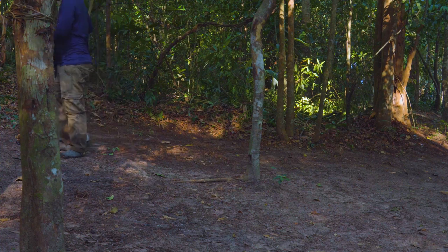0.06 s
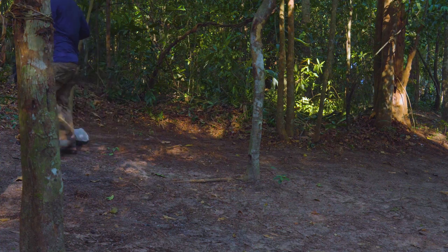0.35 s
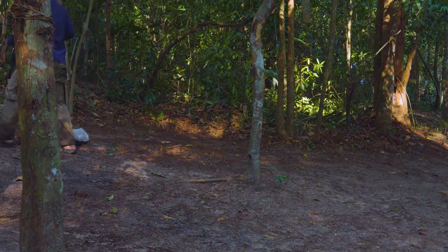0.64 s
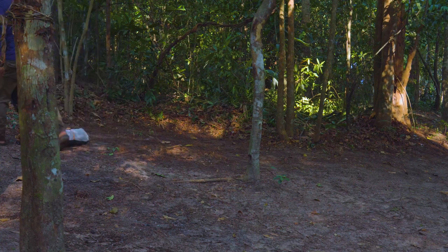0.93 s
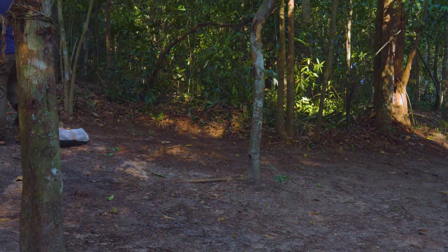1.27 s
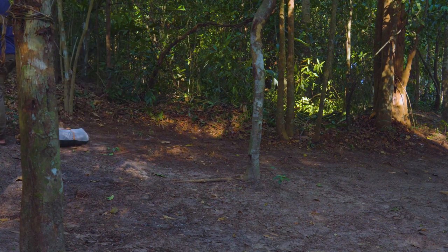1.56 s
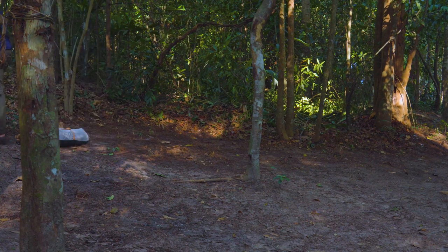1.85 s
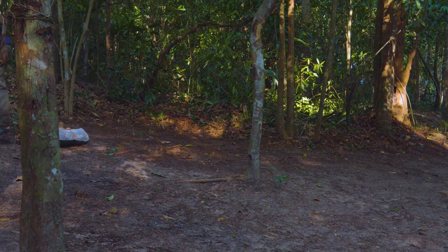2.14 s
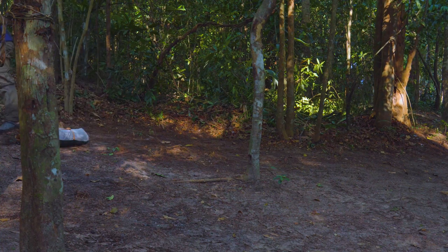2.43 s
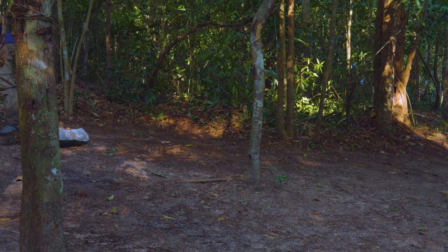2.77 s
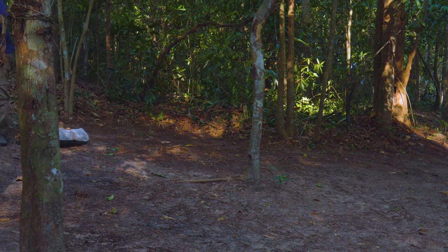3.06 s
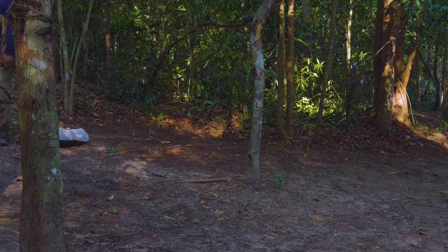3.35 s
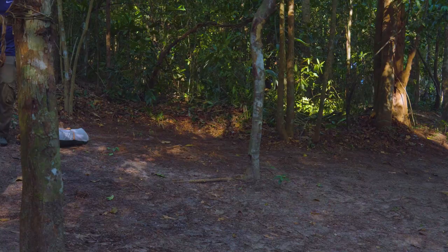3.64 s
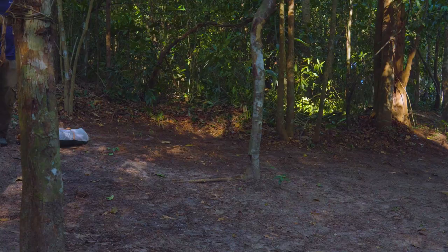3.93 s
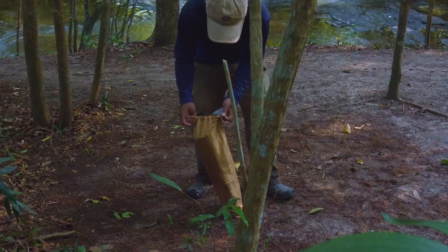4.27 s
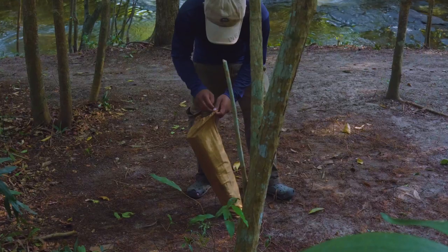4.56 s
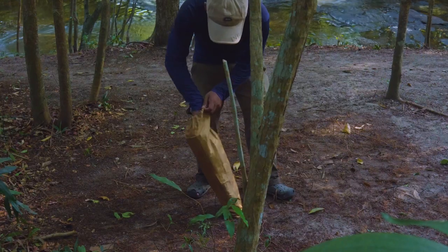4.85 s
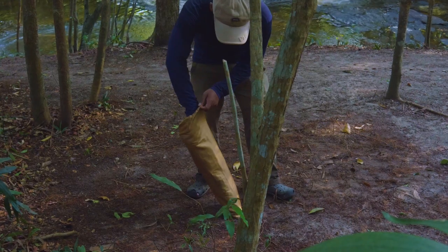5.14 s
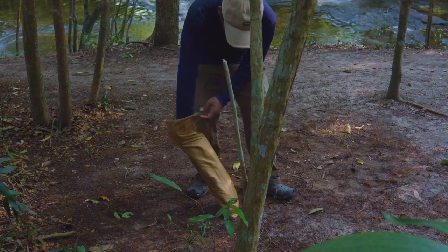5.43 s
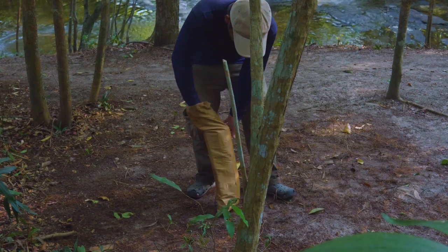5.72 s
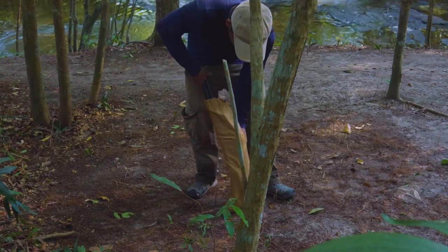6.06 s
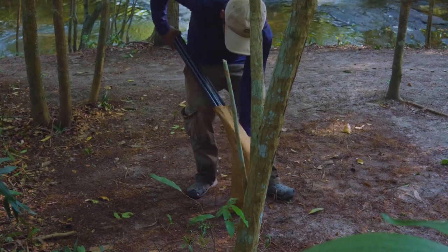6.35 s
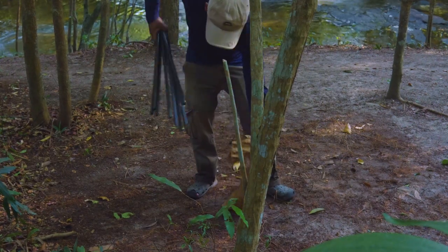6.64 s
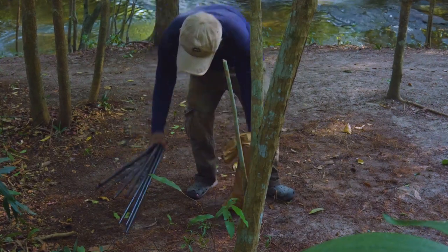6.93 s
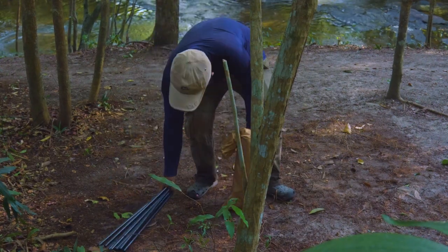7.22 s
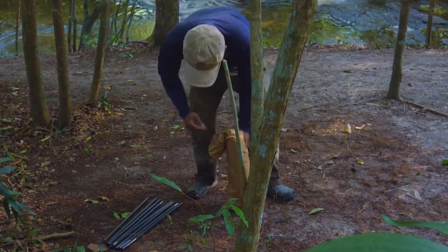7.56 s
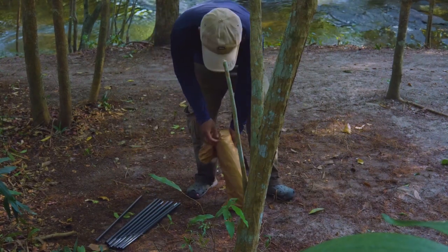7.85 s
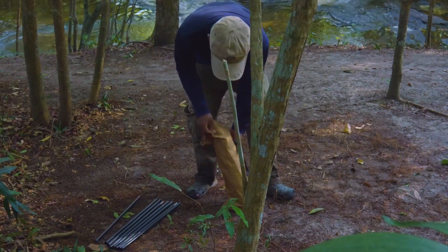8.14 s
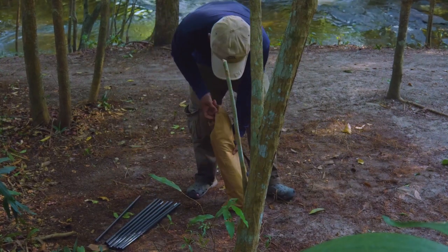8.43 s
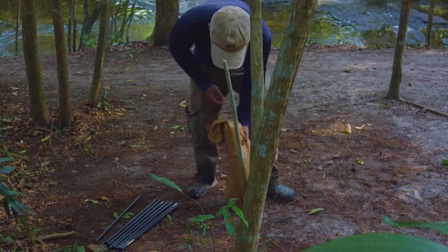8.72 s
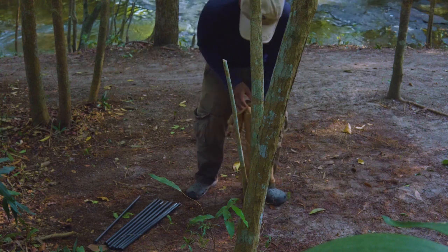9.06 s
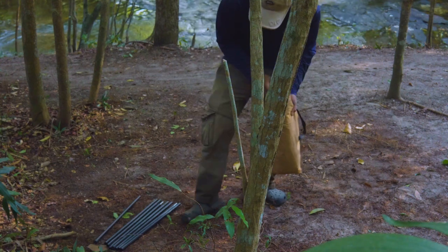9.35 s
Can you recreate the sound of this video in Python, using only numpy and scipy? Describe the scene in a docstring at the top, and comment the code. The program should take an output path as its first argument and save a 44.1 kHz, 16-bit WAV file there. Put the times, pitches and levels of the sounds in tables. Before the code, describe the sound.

A rocky stream rushes and babbles in a forest, with small gurgles and a thin, high cicada whine that swells and eases. About four seconds in, the listening spot changes and the water turns brighter. Metal tent poles click a few times, muffled inside a cloth bag, then drop to the ground nearby with a short, ringing clatter. The stream dips briefly under the loud impacts and swells back.

```python
"""A rocky stream rushes through a forest while cicadas whine in the trees, heard from one spot, then another.
The water sounds by the resonance of air bubbles, the cicadas by tymbal clicks that ring their bodies.
At the second spot metal tent poles click in their bag, slide out and drop to the ground, each impact
exciting their modes. The clatter pushes an automatic gain control down, and the stream swells back."""
import sys
import numpy as np
from scipy import signal
from scipy.fft import rfft, irfft
from scipy.io import wavfile
from scipy.ndimage import uniform_filter1d, minimum_filter1d

SR = 44100
rng = np.random.default_rng(int(sys.argv[2]) if len(sys.argv) > 2 else 0)


def transcribe(signal):
    """Save signal, clipped to [-1, 1], as a 16-bit WAV file at the path in sys.argv[1]."""
    frames = np.atleast_2d(signal).T
    limited = np.clip(frames, -1, 1)
    pcm = np.round(limited * 32767).astype(np.int16)
    wavfile.write(sys.argv[1], SR, pcm)


N = 422919

MOVE_S = 4.135   # the listening spot changes
TYMBAL_HZ = (354.6, 357.2)   # click rate on arrival at each spot
CONTACTS_PER_S = 600   # grain of the poles' chatter
# Modes of the poles. Each row: frequency in Hz, spread between poles in Hz, level in dB, t60 in seconds.
POLE_MODES = [(905, 18, -19, .6), (1420, 20, -14, .3), (1550, 25, -11, .35), (1717, 11, -12.5, .9),
              (1765, 30, -10, .5), (1820, 30, -9, .4), (2170, 25, -5, .43), (2255, 40, -3, .38),
              (2760, 20, -5, .28), (2812, 20, -4, .28), (2897, 7, .5, .31), (2950, 30, -6, .25),
              (3386, 30, -3, .33), (4040, 20, -16, .4), (4198, 22, -11, .5), (4422, 30, -10.5, .5),
              (4500, 25, -15, .5), (4601, 15, -10.5, .55), (4750, 30, -13, .4), (4820, 25, -13, .4),
              (4968, 12, -14, .55), (5272, 14, -19, .5), (5470, 30, -14, .4), (5690, 60, -13, .4),
              (6400, 90, -14, .4), (6800, 100, -15, .4), (7270, 70, -14, .45), (7430, 70, -13, .45),
              (8310, 70, -15.5, .4), (8900, 70, -18, .3), (9080, 70, -17, .4), (9250, 70, -17, .4),
              (10150, 120, -19, .3), (10550, 140, -18, .25), (11150, 60, -19, .28), (11530, 50, -22, .22),
              (12300, 100, -22, .2), (12650, 120, -22, .2)]
# Spectrum of a contact between tubes. Each row: frequency in Hz, spectral density in dB.
CRACK_SPECTRUM = [(40, -41), (300, -78), (900, -61), (1500, 16.5), (3000, 8.5), (5000, 2), (8000, -4),
                  (12500, -4), (15000, -42)]


def from_db(db):
    """Amplitude grows tenfold with every 20 dB."""
    return 10 ** (np.asarray(db) / 20)


def rms_one(x):
    """Normalisation to unit mean power."""
    return x / np.sqrt(np.mean(x ** 2) + 1e-20)


def in_time(points):
    """Linear interpolation of (seconds, value) points at every sample."""
    return np.interp(np.arange(N) / SR, *np.transpose(points))


def at_hz(points, hz):
    """Interpolation of (Hz, value) points on a log-frequency axis."""
    f, value = np.transpose(points)
    return np.interp(np.log(np.maximum(hz, 1)), np.log(f), value)


def at_spots(first, second):
    """A step from one value to another as the listening spot changes."""
    return np.where(np.arange(N) / SR < MOVE_S, first, second)


def drift(rate, size):
    """Random modulation of rms 1, through `rate` points a second."""
    at = np.arange(size) * rate / SR
    return rms_one(np.interp(at, np.arange(4096), rng.standard_normal(4096)))


def low_cut(x, hz):
    """A second-order high-pass: little bass remains below `hz`."""
    return signal.sosfilt(signal.butter(2, hz, "high", fs=SR, output="sos"), x + 1e-18)


def rapids():
    """Bubble resonance among the rocks at the first spot: a far rush under a near babble."""
    # Spectrum of the rush. Each row: frequency in Hz, spectral density in dB.
    spectrum = [(50, -53), (110, -51), (170, -32), (260, -20), (450, -4), (660, 0), (900, -3.0), (1200, -1),
                (1900, -3), (3600, -5.5), (5400, -16), (6100, -18.5), (8500, -24), (12000, -28.5),
                (14500, -45)]
    # Its width. Each row: frequency in Hz, side minus mid in dB.
    side = [(60, -8), (110, -11), (200, -15), (380, -11.5), (690, -8.5), (1280, -0.5), (2360, -3.5),
            (4360, -1), (8040, 10.5), (14800, 29)]
    # Its direction. Each row: frequency in Hz, left minus right in dB.
    pan = [(60, -1.5), (110, 3), (200, -0.5), (380, -3), (690, -5.5), (1280, -9.5), (2360, -5.0),
           (4360, -2), (8040, 2), (14800, -2)]
    near = babble(0, MOVE_S, low_hz=430, high_hz=1400, level_db=-28.5, spread_db=18,
                  pan_shift_db=-6, cycles=24, count=300)
    far = rush(spectrum, side, pan, patchy_db=0.6, flicker_rate=24, lag_s=.00004)
    out = low_cut(near, hz=300)
    add(out, 0, from_db(-35.5) * far)
    return out


def rush(spectrum, side, pan, patchy_db, flicker_rate, lag_s, size=2 ** 18, bands=14):
    """Countless far bubbles sum incoherently to a noise whose half-octave bands swell independently."""
    hz = np.fft.rfftfreq(size, 1 / SR)
    common, apart = rfft(rng.standard_normal((2, size)))
    lean = from_db(at_hz(pan, hz) / 2)
    width = from_db(at_hz(side, hz)) ** 2
    power = lean ** 2 + lean ** -2
    coherence = np.clip((1 - width) / (1 + width) * power / 2, 0, .97)
    ears = np.sqrt(1 + coherence) * common + np.sqrt(1 - coherence) * apart * [[1], [-1]]
    ears *= [lean * np.exp(-2j * np.pi * hz * lag_s), 1 / lean]
    ears *= from_db(at_hz(spectrum, hz)) / np.sqrt(power + 2 * coherence)
    band = np.clip((2 * np.log2(np.maximum(hz, 1) / 140)).astype(int), 0, bands - 1)
    out = sum(irfft(ears * (band == k)) * from_db(patchy_db * drift(flicker_rate, size))
              for k in range(bands))
    return out / np.std(out.mean(axis=0))


def babble(start, end, low_hz, high_hz, level_db, spread_db, pan_shift_db, cycles, count):
    """Nearer bubbles resonate one by one, at random times, pitches and strengths."""
    out = np.zeros((2, N))
    for when, pitch, faintness, place in rng.random((count, 4)):
        pan_db = pan_shift_db + 5.9 * (place - 2)   # negative is to the right
        gain = from_db(level_db - spread_db * np.sqrt(faintness) + pan_db * np.array([[.5], [-.5]]))
        hz = low_hz * (high_hz / low_hz) ** pitch
        add(out, start + when * (end - start), gain * bubble(hz, cycles, rise=0.057))
    return out


def bubble(hz, cycles, rise):
    """A bubble is a damped oscillator whose pitch rises as it nears the surface."""
    age = np.arange(int(cycles * SR / hz)) * hz / SR / cycles   # 0 to 1
    phase = 2 * np.pi * cycles * age * (1 + rise * age / 2)
    return np.sin(phase) * from_db(-60 * age) * (1 - np.exp(-age * cycles))


def add(out, s, sound):
    """Superposition: a stereo sound joins the mix at `s` seconds."""
    i = max(int(s * SR), 0)
    out[:, i:i + sound.shape[-1]] += sound[:, :max(N - i, 0)]


def cicadas(gain_db=-1.7, wander_db=.5, flutter_db=2.5, throb_hz=25, throb_depth=.75):
    """Tymbal clicks drive a body resonance near 6.5 kHz; scattering by trees makes harmonics flutter."""
    # Spectrum of the song, one row to a spot. Each row: relative levels of harmonics 15 to 22 in dB.
    harmonics = [(-17, -6, -2.5, 1.3, -2.5, -4, -23, -16), (-17, -7, -2.5, 1.3, -1, -2, -17, -15)]
    rate, even, odd = tymbals()
    beat_hz = throb_hz + .55 * (rate - TYMBAL_HZ[0]) + 1.8 * drift(12, N)
    beat = 2 * np.pi * np.cumsum(beat_hz) / SR
    balance = 2 * even * odd / (even ** 2 + odd ** 2)   # 1 where even and odd are equally strong
    throb = throb_depth * balance * np.sin(beat)
    levels = even * (1 + throb), odd * (1 - throb)
    wobble = .0037 * (1 + .3 * drift(9, N)) * np.cos(beat) + .0005 * drift(20, N)
    phase = 2 * np.pi * np.cumsum(rate * (1 + wobble)) / SR
    out = np.zeros((2, N))
    for k, spot_dbs in enumerate(zip(*harmonics), 15):
        is_odd = k % 2
        path_phase = .42 * (drift(50, N) + .6 * drift(14, N) * [[1], [-1]]) / (1 + .5 * is_odd)
        flutter = flutter_db * (.75 * drift(70, N) + np.sin(2 * beat + drift(5, N))) / (1 + .3 * is_odd)
        out += from_db(at_spots(*spot_dbs) + flutter) * levels[is_odd] * np.sin(k * phase + path_phase)
    song = from_db(gain_db + wander_db * drift(7.4, N)) * out * np.sqrt(2)
    return song + from_db(10) * forest(song)


def tymbals(sag_hz_per_s=(.75, .85), odd_floor_db=(-62, -68), duck=0.76):
    """The click rate sets a sagging fundamental; swells shift energy from even harmonics to odd ones."""
    # The cicadas' effort. Each row: time in seconds, level of the even harmonics in dB.
    effort = [(0, -51), (.5, -50.5), (1.45, -49.5), (1.8, -56.5), (2.1, -50.5), (2.4, -51.5), (2.8, -53.5),
              (3.8, -54.5), (4.3, -54), (4.8, -49.5), (5.3, -53), (5.65, -49), (6, -51.5), (6.35, -49),
              (6.8, -53.5), (7.9, -49), (8.6, -52.5), (9.15, -50), (9.59, -52.5)]
    # Swells of the song. Each row: middle in seconds, half length in seconds, odd harmonics in dB.
    swells = [(1.14, 0.25, -46.5), (4.395, 0.26, -47), (5.083, 0.19, -49)]
    t = np.arange(N) / SR
    rate = at_spots(TYMBAL_HZ[0] - sag_hz_per_s[0] * t, TYMBAL_HZ[1] - sag_hz_per_s[1] * (t - MOVE_S))
    swell = sum(from_db(db) / (1 + np.abs((t - s) / half_s) ** 3) for s, half_s, db in swells)
    even = from_db(in_time(effort)) * (1 - duck * swell / swell.max())
    odd = np.hypot(from_db(at_spots(*odd_floor_db)), swell)
    return rate, even, odd


def forest(x, t60=0.45, level_db=-21, dull_hz=5000):
    """Reverberation: trunks and leaves scatter back a faint, dull tail."""
    t = np.arange(SR) / SR
    tail = rng.standard_normal((2, SR)) * from_db(-60 * t / t60) * (1 - np.exp(-t / 0.027))
    tail = signal.sosfilt(signal.butter(1, dull_hz, fs=SR, output="sos"), tail)
    return from_db(level_db) * signal.fftconvolve(x, rms_one(tail) / np.sqrt(SR), axes=1)[:, :N]


def gulps(length_s=.03, scatter=0.084, pan_db=-5, count=5):
    """Air trapped between rocks breaks into bubbles of like size, which resonate at like pitches."""
    # Pockets of air. Each row: start in seconds, pitch in Hz, level of the first bubble in dB.
    pockets = [(.085, 742, -26), (.69, 1180, -28), (.775, 652, -30), (.845, 1120, -23.5),
               (.865, 1220, -20.5), (1.41, 1340, -31), (1.579, 640, -34), (1.803, 1110, -35),
               (2.095, 630, -24.5), (2.222, 1210, -30), (2.308, 550, -35), (2.409, 603, -29),
               (2.545, 615, -32), (2.70, 597, -35), (3.009, 580, -32), (3.085, 627, -37), (3.22, 1220, -28),
               (3.297, 880, -35), (3.525, 1220, -27), (3.706, 652, -28), (3.84, 1150, -30)]
    out = np.zeros((2, N))
    for s, hz, db in pockets:
        for k, detune in enumerate(rng.normal(0, scatter, count)):
            gain = from_db(db - 5.6 * k + pan_db * np.array([[.5], [-.5]]))
            add(out, s + length_s * k / count, gain * bubble(hz * np.exp(detune), cycles=44, rise=0.096))
    return low_cut(out, hz=250)


def shallows():
    """Bubble resonance over gravel at the second spot: a brighter rush and a higher babble."""
    # Spectrum of the rush. Each row: frequency in Hz, spectral density in dB.
    spectrum = [(50, -54), (110, -52.5), (170, -39.5), (260, -20.5), (450, -7.5), (1000, -2), (1900, 0.5),
                (2900, -2.5), (4200, -7.5), (5500, -13.5), (6100, -18.5), (7400, -17), (8500, -22.5),
                (11000, -23.5), (13000, -32), (14500, -43)]
    # Its width. Each row: frequency in Hz, side minus mid in dB.
    side = [(60, -13), (110, -17), (200, -22), (380, -16), (690, -13), (1280, -10.5), (2360, -9.5),
            (4360, -6), (8040, 5), (14800, -10.5)]
    # Its direction. Each row: frequency in Hz, left minus right in dB.
    pan = [(60, -0.5), (110, 0.0), (200, -0.5), (380, -0.61), (690, -0.34), (1280, -0.8), (2360, -1.2),
           (4360, 0.5), (8040, -0.72), (14800, 0.0)]
    near = babble(MOVE_S, N / SR, low_hz=900, high_hz=3200, level_db=-27, spread_db=16,
                  pan_shift_db=0, cycles=14, count=450)
    far = rush(spectrum, side, pan, patchy_db=1.0, flicker_rate=22, lag_s=0, size=6 * SR)
    out = low_cut(near, hz=600)
    add(out, MOVE_S - .5, from_db(-36.33) * far)
    return out


def poles(gain_db=-2.5, pan_db=0.7, bag_ring=0.061, cloth_hz=7500):
    """Impacts crack and ring: the harder the contact, the faster its onset and the broader its spectrum."""
    # Clicks in the bag. Each row: start in seconds, level in dB, frequency favoured by the point of
    # contact in Hz, hardness from 0 to 1.
    bag_clicks = [(4.964, -29, 7500, 0.9), (4.967, -26, 9200, .45), (5.188, -20, 7000, 0.7),
                  (5.194, -12, 2900, .5), (5.199, -23, 4480, .55), (5.311, -18.5, 2190, 0.73),
                  (5.392, -30, 7420, 0.8), (5.448, -17, 9100, 0.35), (5.45, -20, 2200, 0.81),
                  (6.189, -10.5, 1740, 0.22), (6.386, -17, 1880, 0.48), (6.434, -20.5, 8600, 0.67)]
    # Bare poles hit each other and the ground. Each row: as above, then ring as a share of the free t60.
    knocks = [(6.365, -23, 4460, 0.25, 0.65), (7.117, -22, 3050, 0.93, 0.21),
              (7.139, 6.5, 3090, 0.4, 0.089), (7.146, -11, 4490, 0.17, 0.45), (7.198, -3, 2580, 0.69, 0.21),
              (7.214, -22, 4600, 0.8, 0.25), (7.226, -23, 5000, 0.9, 0.2), (7.233, -17, 4380, 0.86, 0.59),
              (7.240, -17, 7300, 0.97, 0.16), (7.247, 4, 3020, 0.33, 0.14), (7.258, -8.5, 4460, 0.02, 0.91),
              (7.325, -16, 1700, 0.52, 1), (7.406, -1.5, 1900, 0.9, 0.27), (7.412, 0, 2190, .3, .17),
              (7.414, -9, 4500, .9, .15), (7.424, 8, 2897, 0.05, 0.42), (7.425, -13, 905, .02, .6),
              (7.440, -11, 3386, .2, .4), (7.476, -15, 2150, 0.3, 0.34), (7.504, -19.5, 4650, 0.45, 0.95),
              (7.521, -22, 2760, 0.2, 0.26), (7.543, -21, 7350, .7, .3), (7.556, -8.5, 1730, 0.2, 0.77),
              (7.561, -16, 2830, 0.27, 0.22), (7.596, -22, 4500, 0.7, 0.22),
              (7.624, -9.5, 2320, 0.38, 0.33), (7.648, -21.5, 4700, 0.88, 0.3),
              (7.680, -24, 2240, 0.78, 0.56), (7.732, -17.5, 1717, 0, 1), (7.745, -28, 2170, .05, .8)]
    in_bag = [(*click, bag_ring) for click in bag_clicks]
    in_open = list(knocks) + settling()
    bagged, bare, shakes = np.zeros((2, N)), np.zeros((2, N)), []
    for out, rows, lift_db in (bagged, in_bag, 17), (bare, in_open, 0):
        for s, db, favoured_hz, hardness, ring in rows:
            blend = np.array([1 - hardness, hardness])   # weighs each pair: glancing touch, square hit
            build_s = np.prod((0.0045, 0.00044) ** blend)
            focus = np.prod((0.018, 0.42) ** blend)   # relative width of the favoured region
            boost_db = blend @ (24, 4)
            crack_db = blend @ (-30, 1)
            add(out, s, knock(db - boost_db + gain_db, build_s, ring, favoured_hz, boost_db, focus))
            add(out, s, from_db(db + crack_db + gain_db) * crack(build_s, favoured_hz, lift_db))
            shakes.append((s, db - boost_db, ring))
    add(bare, shakes[0][0], jiggle(shakes))
    muffled = signal.sosfilt(signal.butter(1, cloth_hz, fs=SR, output="sos"), bagged + 1e-18)
    return low_cut(bare + muffled, hz=710) * from_db([[pan_db / 2], [-pan_db / 2]])


def knock(db, build_s, ring, favoured_hz, boost_db, focus, uneven_db=0.5, wide_hz=6500, count=3):
    """Modal vibration of the struck pole and its detuned neighbours, damped by hand, bag or ground."""
    t = np.arange(int(np.clip(ring, .05, 1) * .6 * SR)) / SR
    out = np.zeros((2, len(t)))
    for hz, spread_hz, mode_db, t60 in POLE_MODES:
        detune, weakness, turn = rng.standard_normal((3, count))
        tunings = hz + spread_hz * detune * (np.arange(count) > 0)
        weights = from_db(-uneven_db * weakness) / np.sqrt(1 + 2 * np.arange(count))   # struck pole first
        ear_phase = np.outer([1, -1], turn) * min(hz / wide_hz, 2) / 2   # high modes sound wider
        phases = 2 * np.pi * rng.random(count) + ear_phase
        waves = np.sin(2 * np.pi * tunings[:, None] * t + phases[..., None])
        boost = boost_db * np.exp(-.5 * (np.log(hz / favoured_hz) / focus) ** 2)
        out += weights @ waves * from_db(mode_db + boost - 60 * t / (t60 * ring))
    return from_db(db) * out * (1 - np.exp(-t / max(build_s, 1 / SR)))


def crack(build_s, favoured_hz, lift_db, lift_width=0.51, t60=0.057, width=0.2, size=8192):
    """Contact noise: tubes chatter in a brief burst, coloured by the point of contact."""
    t = np.arange(size) / SR
    hz = np.geomspace(40, 15000, 80)
    lift = lift_db * np.exp(-.5 * (np.log(hz / favoured_hz) / lift_width) ** 2)
    spectrum = np.transpose([hz, at_hz(CRACK_SPECTRUM, hz) + lift])
    mid, side = chatter(spectrum, size, grain_db=1.5)
    envelope = from_db(-60 * t / t60) * (1 - np.exp(-t / max(build_s / 2, 1 / SR)))
    return (mid + width * side * [[1], [-1]]) * envelope


def chatter(spectrum, size, grain_db):
    """Tiny uneven contacts sum to amplitude-modulated noise, filtered to a spectrum; rms 1."""
    contacts = rng.standard_normal((2, size)) * from_db(grain_db * drift(CONTACTS_PER_S, size))
    colour = from_db(at_hz(spectrum, np.fft.rfftfreq(size, 1 / SR)))
    return rms_one(irfft(rfft(contacts) * colour, size))


def jiggle(shakes, settle_s=0.2, level_db=-12.5, per_s=300, ring=0.047, rasp_db=-9.5, width=0.56):
    """Random excitation: each knock shakes the loose poles, which ring briefly and rasp tube on tube."""
    size = 2 ** 17 + 2 ** 13
    t, power, rings = np.arange(size) / SR, 0, 0
    for s, db, free in shakes:
        age = t - (s - shakes[0][0])
        power += (age > 0) * from_db(2 * db) * np.exp(-2 * np.abs(age) / (settle_s * free))
    for hz, _, mode_db, t60 in POLE_MODES:
        clicks = rng.standard_normal((2, size)) * (rng.random(size) < per_s / SR)
        r, w = from_db(-60 / (t60 * ring * SR)), 2 * np.pi * hz / SR   # decay and angle per sample
        mode = signal.lfilter([np.sin(w), -np.sin(w)], [1, -2 * r * np.cos(w), r * r], clicks + 1e-18)
        rings += from_db(mode_db) * mode / np.sqrt(w)
    rasp = chatter(CRACK_SPECTRUM, size, grain_db=4)
    mid, side = rms_one(rings) + from_db(rasp_db) * rasp
    return from_db(level_db) * (mid + width * side * [[1], [-1]]) * np.sqrt(power)


def settling(start_s=7.485, gap_s=.034, fade_db_per_s=22, hardness=0.049, ring=0.57, count=6):
    """Dissipation: the poles settle in fading touches at uneven gaps, given as rows of knocks."""
    # Modes excited in turn. Each row: frequency in Hz, level before the fade in dB.
    modes = [(910, -6), (1725, -8.5), (2180, -31)]
    ages = gap_s * (np.arange(count) + rng.uniform(-.3, .3, count))
    pitches, levels = np.transpose(modes)[:, np.arange(count) % len(modes)]
    return [(start_s + age, db - fade_db_per_s * age, hz, hardness, ring)
            for age, hz, db in zip(ages, pitches, levels)]


def scene(surge_db=0.6, surges_per_s=1.39):
    """Superposition of water, cicadas and poles; an equal-power crossfade joins the two streams."""
    flow = from_db(-surge_db * drift(surges_per_s, N))
    moved = in_time([(MOVE_S - .01, 0), (MOVE_S + .01, 1)])
    water = flow * (np.sqrt(1 - moved) * rapids() + np.sqrt(moved) * shallows()) + gulps()
    clatter = poles()
    return water + cicadas() + clatter + forest(clatter)


def record(dry, ceiling_db=-10.7, deepest_db=4.0, hold_s=0.4, recover_db_per_s=4.5,
           limiter_db_per_s=600, cutoff_hz=14600):
    """Automatic gain control ducks at peaks, holds and creeps back; a limiter and a low-pass follow."""
    t = np.arange(N) / SR
    peak_db = 20 * np.log10(np.abs(dry).max(axis=0) + 1e-9)
    over = np.maximum(peak_db - ceiling_db, 0)
    size = 2 * int(hold_s * SR / 2) + 1
    held = -minimum_filter1d(-np.minimum(over, deepest_db), size, origin=size // 2)
    slow = np.maximum.accumulate(held + recover_db_per_s * t) - recover_db_per_s * t
    fast = np.maximum.accumulate(over + limiter_db_per_s * t) - limiter_db_per_s * t
    gain_db = uniform_filter1d(minimum_filter1d(-np.maximum(slow, fast), size=61), size=61)
    low_pass = signal.ellip(10, .1, 80, cutoff_hz, fs=SR, output="sos")
    return signal.sosfilt(low_pass, dry * from_db(gain_db))


dry = scene()
out = record(dry)
transcribe(out)
```